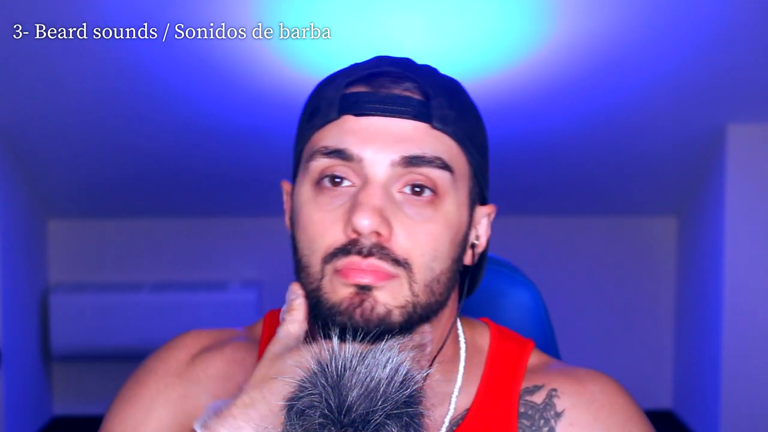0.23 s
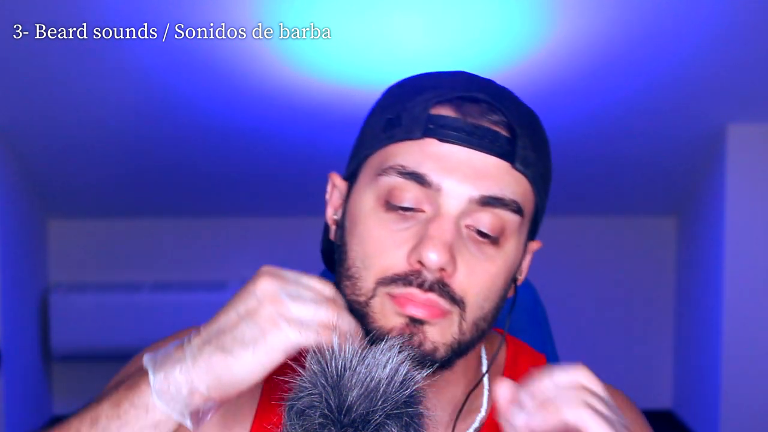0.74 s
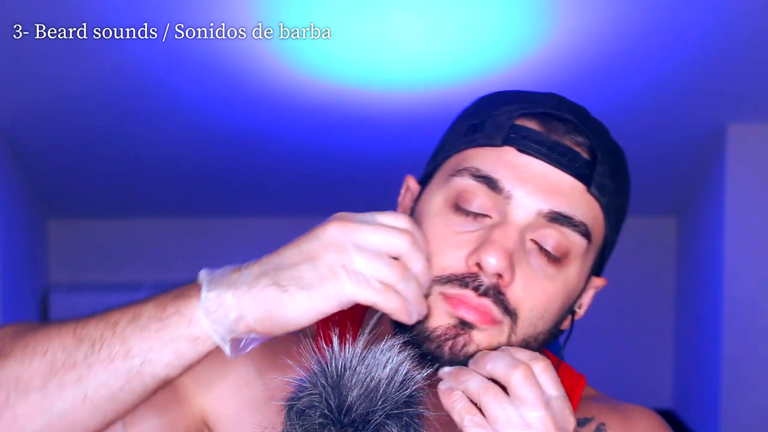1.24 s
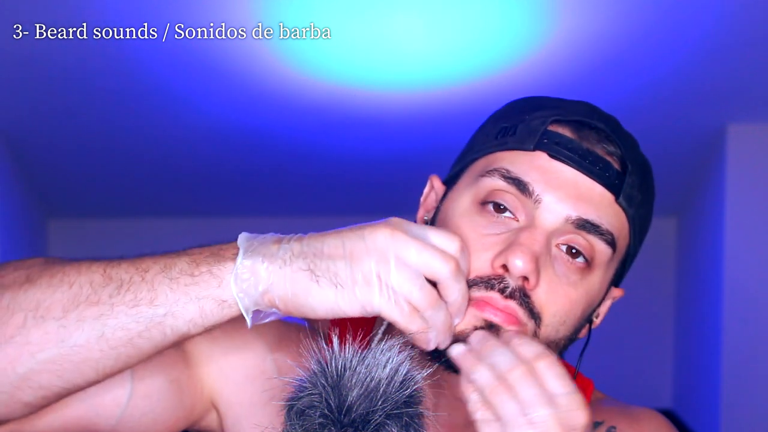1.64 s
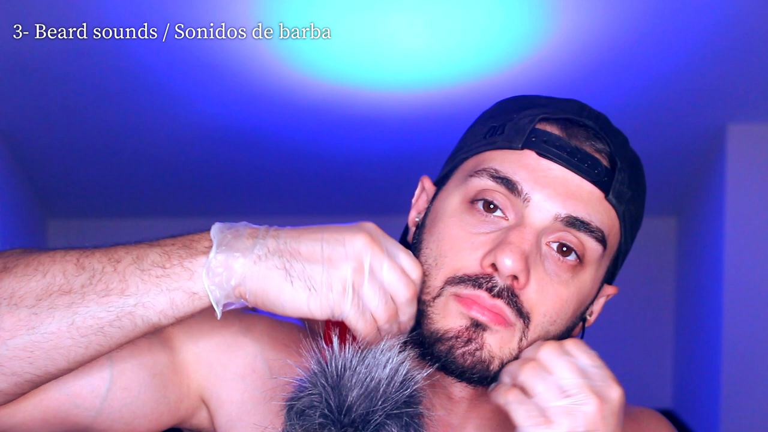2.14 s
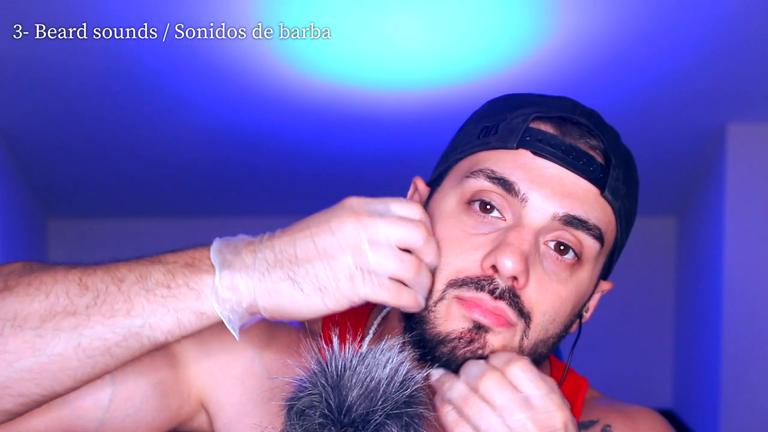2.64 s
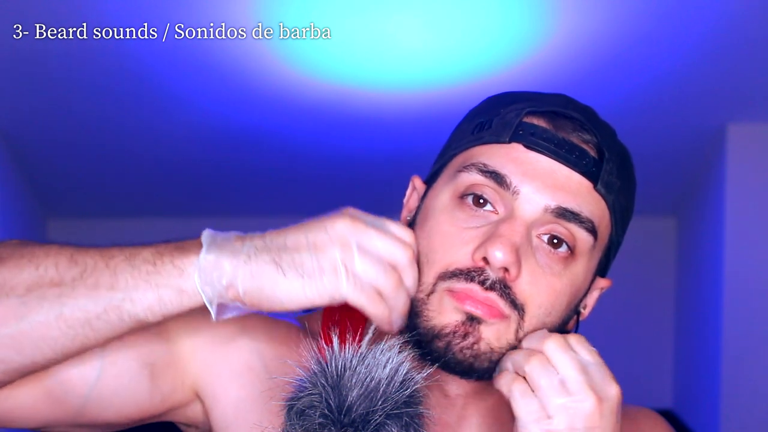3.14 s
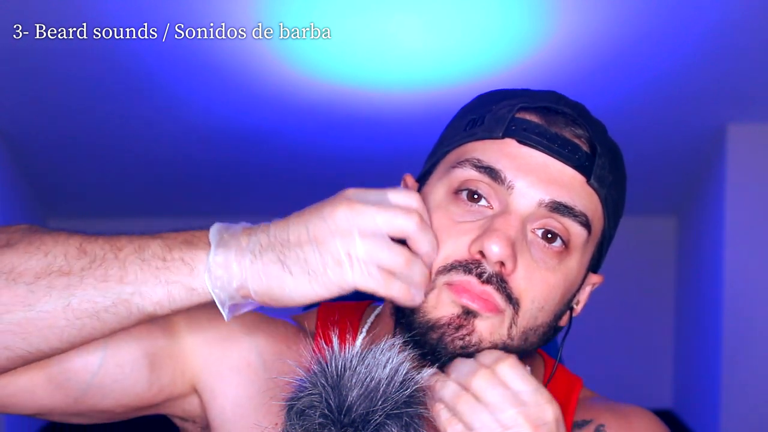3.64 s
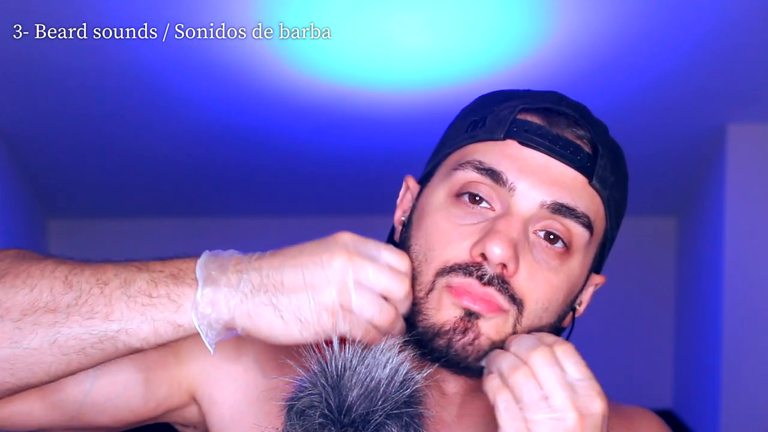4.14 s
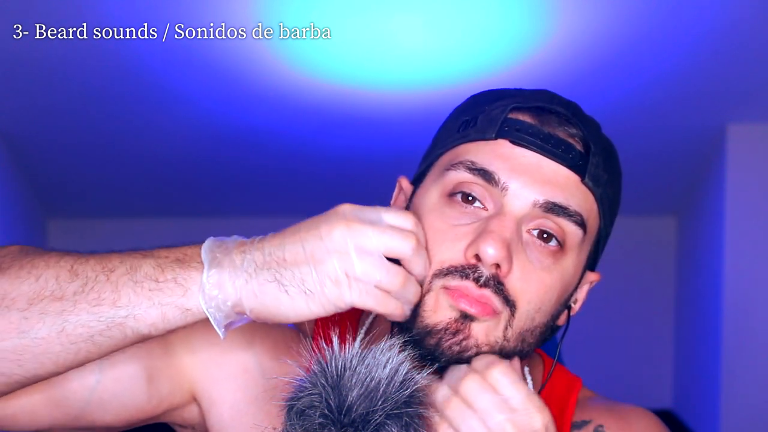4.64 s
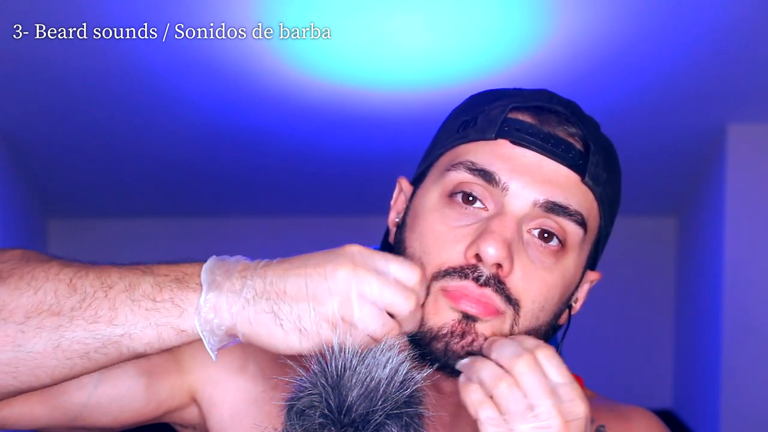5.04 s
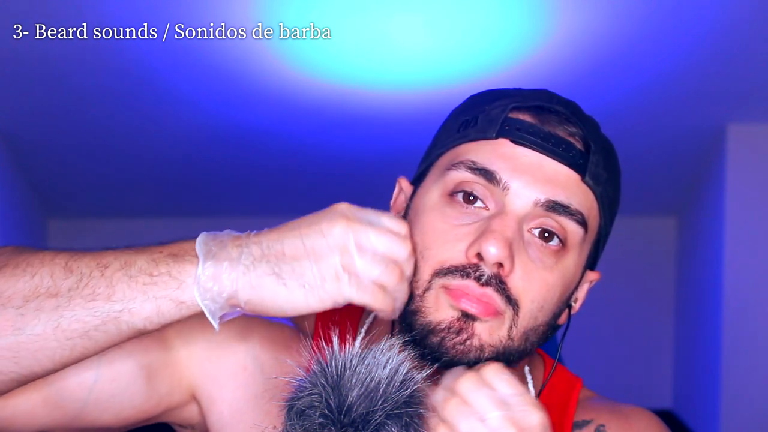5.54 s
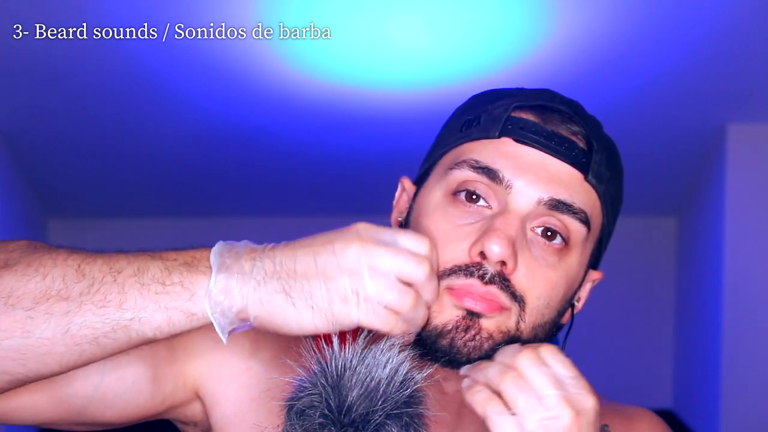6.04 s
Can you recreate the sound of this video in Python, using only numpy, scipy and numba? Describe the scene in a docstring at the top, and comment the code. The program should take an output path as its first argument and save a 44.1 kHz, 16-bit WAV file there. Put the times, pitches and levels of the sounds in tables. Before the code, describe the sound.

Close, bristly beard scratching in uneven strokes, first on the chin, then also on the right, with a faint appliance hum behind.

```python
"""Two gloved hands scratch a short beard close to a furry stereo microphone in a small room.
From the start an appliance hums, air stirs and a flutter too low to hear rocks the microphone.
One hand works on the chin: thousands of hairs catch and slip free, and skin rubs softly under them.
Something bumps at 0.3 s, then single stiff hairs begin to snap and a fingertip taps now and then.
At 1.1 s the other hand joins in on the cheek, to the right. A low rumble swells once, around 2.5 s."""
import sys
import numpy as np
from scipy import signal
from scipy.fft import rfft, irfft, next_fast_len
from scipy.io import wavfile
from scipy.ndimage import uniform_filter1d, map_coordinates
from numba import njit

SR = 44100
rng = np.random.default_rng(int(sys.argv[2]) if len(sys.argv) > 2 else 0)


def transcribe(u):
    """Save the signal u as a 16-bit wav file named by the first command-line argument.

    u: samples, shape (n,) or (channels, n), limited to [-1, 1]; the rate is SR.
    q: integer samples, one column per channel.
    """
    v = np.clip(np.atleast_2d(u).T, -1, 1)
    q = np.round(v * 32767).astype(np.int16)
    wavfile.write(sys.argv[1], SR, q)


N = 276948
TIME = np.arange(N) / SR
CONTROL_TIME = TIME[::64]  # a coarser clock for slow changes
REST_HZ = 9830  # pitch of the hairs between strokes


def undb(db):
    """Turn decibels into a gain to multiply by."""
    return 10 ** (np.asarray(db) / 20)


def unit(x):
    """Scale a sound to an average (rms) level of 1."""
    return x / np.sqrt(np.mean(x ** 2))


def colour(x, points):
    """Shape the tone along a curve of (pitch_hz, level_db) points."""
    hz, db = np.transpose(points)
    size = next_fast_len(N, True)
    freqs = np.maximum(np.arange(size // 2 + 1) * SR / size, 1)
    gain = undb(np.interp(np.log(freqs), np.log(hz), db))
    return irfft(rfft(x, size) * gain, size)[..., :N]


def walk(rate_hz):
    """A smooth random wobble of size about 1 that turns about rate_hz times a second."""
    hold = max(int(SR / rate_hz), 1)
    steps = np.repeat(rng.standard_normal(N // hold + 1), hold)
    return unit(uniform_filter1d(steps, hold)[:N])


def stereo_noise(alike_hz):
    """Noise that is the same left and right below alike_hz."""
    mid, side = rng.standard_normal((2, N))
    side = signal.sosfilt(signal.butter(1, alike_hz, "high", fs=SR, output="sos"), side)
    return mid + side * np.array([[1], [-1]])


def room_echo(x, fade_s, onset_s):
    """The walls return a cloud of echoes, different on each side, that falls 60 dB in fade_s."""
    t = TIME[:SR]
    build_up = 1 - np.exp(-(t / onset_s) ** 2)
    tails = rng.standard_normal((2, SR)) * np.exp(-np.log(1000) * t / fade_s) * build_up
    tails /= np.sqrt(np.sum(tails ** 2, axis=1, keepdims=True))
    return signal.fftconvolve(x[None], tails, axes=1)[:, :N]


def appliance_hum():
    """An appliance hums with a few steady tones; the higher ones waver more."""
    # tones of the hum: pitch_hz, level_db
    tones = [(100, -51.5), (152.7, -66), (300.7, -72), (505, -75), (630, -74), (872, -78.5)]
    hum = np.zeros(N)
    for hz, db in tones:
        phase = 2 * np.pi * (hz * TIME + rng.random()) + hz / 700 * walk(5)
        hum += undb(db) * np.sqrt(2) * np.sin(phase)
    return hum


def room_air():
    """The room gives a low hush, and a draught blows on each side of the microphone."""
    # tone of the hush: pitch_hz, level_db
    hush_tone = [(8, 8), (34, 19.5), (42, -6), (62, 2), (90, 0.5), (180, -5), (400, -6.5), (700, -16.5),
                 (1500, -25.5), (5000, -9), (16000, -19.5)]
    # tone of the draught: pitch_hz, level_db
    draught_tone = [(12, 3.5), (60, -21), (130, -33), (2000, -94)]
    hush = unit(colour(stereo_noise(1240), hush_tone)) * undb(-48.5)
    draught = unit(colour(rng.standard_normal((2, N)), draught_tone)) * undb(-52)
    return hush + draught


def flutter():
    """A wave too slow to hear rocks the microphone."""
    # depth of the rocking: time_s, level_db
    depths = [(0, -24), (2.5, -40), (4.2, -24), (6.28, -30)]
    rate_hz = 3 + .6 * walk(2.5)
    depth = undb(np.interp(TIME, *np.transpose(depths)))
    return np.sin(2 * np.pi * np.cumsum(rate_hz) / SR) * depth


def strokes(table, rest_db, lands_s):
    """Fingers bite in, drag and lift. Gives gain, hair pitch (octaves from REST_HZ) and rasp (Hz)."""
    attack_s, release_s = 0.025, 0.024
    rest_rasp_hz, sag_octaves_per_s = 5240, 0.56
    # once the hand has landed, it stirs the hair even between strokes
    power = undb(rest_db) ** 2 * np.clip((CONTROL_TIME - lands_s) / attack_s, 1e-4, 1)
    pitch_sum, rasp_sum = 0, power * rest_rasp_hz
    for start, length, db, hz, rasp_hz in table:
        age = CONTROL_TIME - start
        contact = np.clip(age / attack_s, 0, 1) * np.exp(-np.maximum(age - length, 0) / release_s)
        push = (contact * undb(db)) ** 2
        # the rasp sinks as the stroke draws the hairs out longer
        sag = 2 ** (-sag_octaves_per_s * (age - length / 2))
        power += push
        pitch_sum += push * np.log2(hz / REST_HZ)
        rasp_sum += push * rasp_hz * sag
    return np.sqrt(power), pitch_sum / power, rasp_sum / power


def sideways(times):
    """How far the hands have moved from in front of the microphone (0) to its side (1)."""
    return np.interp(times, [.8, 1.35], [.15, 1])


def flicks(times, sizes, hz, cycles):
    """Each freed hair gives a tiny wave that peaks at its time and dies within a cycle or two."""
    index = (times * SR).astype(int)[:, None] + np.arange(-10, 26)
    turns = (index / SR - times[:, None]) * hz[:, None]
    age = np.maximum(1 + turns / cycles, 0)
    waves = sizes[:, None] * (age * np.exp(1 - age)) ** 2 * np.cos(2 * np.pi * turns)
    return np.bincount(np.clip(index, 0, N - 1).ravel(), waves.ravel(), N)


def stereo_flicks(times, sizes, hz, cycles, lag_s, pan_db, bounce_db):
    """A flick reaches the right side first, the left later and duller, and bounces off face or palm."""
    # tone on the far (left) side: pitch_hz, level_db
    far_tone = [(2000, 5), (5000, 2), (8000, 5), (11000, 3), (15500, -1.5)]
    detour_s = 0.000188 + .0006 * rng.exponential(size=(len(times), 2)).T
    right = flicks(times, sizes, hz, cycles)
    right += flicks(times + detour_s[0], sizes * undb(bounce_db), hz, cycles)
    left = flicks(times + lag_s, sizes * undb(pan_db), hz, cycles)
    left += flicks(times + detour_s[1], sizes * undb(.5 * pan_db - 15), hz, cycles)
    return np.array([colour(left, far_tone), right])


@njit
def rasp(x, hz, width, ring, leak):
    """The longest hairs in the grip ring at hz; below that only the share leak gets through."""
    y, band_state, low_state = np.empty(len(x)), 0., 0.
    for i in range(len(x)):
        step = np.tan(np.pi * hz[i] / SR)
        band = (band_state + step * (x[i] - low_state)) / (1 + step * (step + width))
        low = low_state + step * band
        high = x[i] - width * band - low
        band_state, low_state = 2 * band - band_state, 2 * low - low_state
        y[i] = high + ring * band + leak * low
    return y


def glove(x, delay_s, share):
    """The glove throws the sound back; as the fingers flex, the gap changes and the tone shifts."""
    positions = np.arange(N) - SR * delay_s * np.exp(0.34 * walk(11))
    echo = map_coordinates(x, [positions], order=3)
    return (x - share * echo) / np.hypot(1, share)


def scratch(hand, count, size_db, limit_db, catch_db, lag_s, pan_db):
    """A fingertip ploughs through stubble: many faint flicks, a few strong, in clumps as it catches."""
    # tone of the beard: pitch_hz, level_db
    beard_tone = [(300, -8.5), (1500, 3.5), (3200, 4.5), (5000, 1), (8000, -5), (11000, -2.5), (15500, 1)]
    times = rng.uniform(0, N / SR, count)
    gain, pitch, rasp_hz = (np.interp(TIME, CONTROL_TIME, control) for control in hand)
    detune, lag_spread, pan_spread = rng.standard_normal((3, count))
    pull_db = size_db * rng.exponential(size=count) + catch_db * np.interp(times, TIME, walk(140))
    # a hair can only bend so far before it slips
    bend = np.tanh(pull_db / limit_db)
    sizes = undb(limit_db * bend) * rng.choice([-1, 1], count)
    # hairs held shorter or bent further ring higher
    octaves = np.interp(times, TIME, pitch) + 0.17 * detune * (1 - .5 * bend) + 0.041 * (bend - .5)
    hz = np.clip(REST_HZ * 2 ** octaves, 1000, SR * .42)
    sound = stereo_flicks(times, sizes * np.sqrt(hz / REST_HZ), hz, cycles=0.65,
                          lag_s=lag_s * sideways(times) + .000018 * lag_spread,
                          pan_db=pan_db + 0.79 * pan_spread, bounce_db=-8.5)
    sound = [rasp(side, rasp_hz, width=.58, ring=.52, leak=.47) for side in sound]
    sound = [glove(side, delay_s=0.000187, share=0.22) for side in sound]
    sound = colour(np.array(sound), beard_tone)
    return gain * sound / np.sqrt(np.mean(sound[1] ** 2))


def chin_scratch():
    """One hand draws slow strokes through the hair on the chin, nearly in front."""
    # strokes on the chin: start_s, length_s, level_db, pitch_hz, rasp_hz
    chin_strokes = [(0, 0.14, -48, 10200, 5300), (0.135, 0.085, -40.5, 9200, 5130),
                    (0.348, 0.225, -40.5, 9350, 5870), (0.545, 0.074, -38, 8100, 6960),
                    (0.629, 0.12, -42, 8100, 5750), (0.762, 0.24, -40.5, 9250, 4700),
                    (1.005, 0.345, -43, 9600, 6200), (1.455, 0.12, -41.5, 9400, 6300),
                    (1.728, 0.073, -42, 8800, 4900), (2.369, 0.29, -40.5, 9900, 4630),
                    (2.72, 0.32, -41.0, 9700, 5000), (3.213, 0.199, -45, 8700, 4350),
                    (3.484, 0.13, -42, 11200, 6260), (3.692, 0.25, -39.5, 10700, 5000),
                    (4.436, 0.35, -40.5, 9700, 5030), (4.788, 0.232, -39.5, 9400, 4200),
                    (5.57, 0.15, -40.5, 9400, 4740), (5.722, 0.023, -40, 6850, 4330),
                    (5.85, 0.23, -40, 9200, 4740)]
    hand = strokes(chin_strokes, rest_db=-43 - 6, lands_s=0)
    return scratch(hand, count=26000, size_db=3, limit_db=27, catch_db=1.5, lag_s=.000058, pan_db=-3.5)


def rubs(table, rest_db):
    """Gain of slow rubs that swell and fade over a light resting touch."""
    swells = sum((undb(db) * np.exp(-.5 * ((TIME - middle) / half) ** 2)) ** 2
                 for middle, half, db in table)
    return np.sqrt(undb(rest_db) ** 2 + swells)


def skin_rub():
    """Gloves stick and slip on skin: a grainy sound, light from fingertips and dull from palms."""
    # fingertips dragging over skin: middle_s, half_length_s, level_db
    tip_rubs = [(.58, 0.041, -56.5), (1.66, 0.38, -58.5), (4.8, 0.19, -58.5), (5.86, 0.2, -54)]
    # tone of the fingertips: pitch_hz, level_db
    tip_tone = [(200, 3), (800, 3), (2000, 5), (3000, -5), (6000, -16.5)]
    # palms and arms brushing as they move into place: middle_s, half_length_s, level_db
    palm_rubs = [(.58, 0.13, -51.5), (.9, 0.24, -59.5), (1.8, 0.29, -59), (3.35, 0.35, -62.5),
                 (5.38, 0.13, -61)]
    # tone of the palms: pitch_hz, level_db
    palm_tone = [(100, 1), (220, 12.5), (480, 7.5), (700, -2), (950, 4), (1600, -8), (4000, -64)]
    grain = undb(2.14 * walk(450) + 1.77 * walk(35))
    tips = unit(colour(stereo_noise(1800) * grain, tip_tone)) * rubs(tip_rubs, rest_db=-61)
    palms = unit(colour(stereo_noise(1700) * grain, palm_tone)) * rubs(palm_rubs, rest_db=-67.5)
    return (tips + palms) * undb([[-1.6], [1.3]])  # a little to the right


def bump():
    """A soft blow near the microphone rings briefly in the room."""
    # the blow and its rebound: start_s, level_db
    hits = np.array([(0.2941, -32), (0.3081, -39)])
    # tones it rings with: pitch_hz, level_db, fade_s (time to fall 60 dB)
    tones = [(256, -0.5, 0.055), (411, 0.5, 0.031), (459, -5, 0.18), (500, -8.5, 0.11), (600, -4.5, 0.035),
             (1030, -7, 0.015), (1480, -19, 0.022)]
    age = np.maximum(TIME[:SR] - hits[:, :1], 0)
    ring = sum((-1) ** k * undb(db) * np.sin(2 * np.pi * hz * age) * np.exp(-np.log(1000) * age / fade_s)
               for k, (hz, db, fade_s) in enumerate(tones))
    blow = np.pad(undb(hits[:, 1]) @ ring, (0, N - SR))
    # long waves reach both sides alike, so they share one echo
    echo = room_echo(blow, fade_s=0.65, onset_s=0.005)[0] * undb(-4.7)
    return (blow + echo) * undb([[-1.1], [.7]])


def hair_snaps():
    """Stiff hairs snap free one at a time, each with a sharp tick."""
    # single hairs: time_s, level_db, pitch_hz
    hairs = [(0.5747, -17.5, 8500), (0.6783, -16, 7200), (0.7134, -14, 6600), (0.7383, -16, 6800),
             (0.8255, -18, 8700), (1.1145, -16, 8100), (1.4595, -13, 7900), (1.5331, -16.5, 7200),
             (1.6898, -4, 12800), (1.7101, -13, 8000), (1.7976, -14.5, 12500), (2.1096, -12, 8600),
             (2.2054, -13, 12300), (2.2848, -9.8, 10600), (2.9388, -10.5, 9000), (3.1171, -10, 8500),
             (3.5004, -6, 10700), (3.5193, -4, 9800), (3.5519, -7.5, 11200), (3.8945, -7.5, 13000),
             (3.9875, -7.5, 9200), (4.0715, -10, 11700), (4.1154, -1, 10400), (4.1891, -7, 10100),
             (4.434, -12, 9300), (4.455, -11, 9400), (4.6279, -14.5, 7500), (4.9074, -13, 10400),
             (5.1826, -9.5, 9900), (5.23, -15, 9300), (5.5219, -11.3, 10400), (6.0258, -5.5, 8700),
             (6.0349, -13, 7900)]
    times, level_db, hz = np.transpose(hairs)
    side = sideways(times)
    snaps = stereo_flicks(times, undb(level_db), hz, cycles=.7, lag_s=.00014 * side,
                          pan_db=-3 - 10 * side, bounce_db=-15)
    # a hair is too thin to give off bass
    return signal.sosfilt(signal.butter(2, 4200, "high", fs=SR, output="sos"), snaps)


def finger_taps():
    """A fingertip lands: a soft pat that the flesh damps at once."""
    # taps on the jaw: start_s, level_db, pitch_hz
    taps = [(.589, -42, 840), (1.043, -45, 433), (4.521, -46.5, 980), (5.464, -44, 1900)]
    pats = np.zeros(N)
    for start, db, hz in taps:
        age = np.maximum(TIME - start, 0)
        pats += undb(db) * np.sin(2 * np.pi * hz * age) * np.exp(-age / 0.0049)
    return pats


def cheek_scratch():
    """The other hand lands later and scratches the cheek, quicker and louder, on the right."""
    # strokes on the cheek: start_s, length_s, level_db, pitch_hz, rasp_hz
    cheek_strokes = [(1.095, 0.041, -43, 8900, 6800), (1.283, 0.1, -37, 9500, 7300),
                     (1.42, 0.14, -37.5, 8540, 7200), (1.708, 0.22, -35.5, 11100, 4630),
                     (2.022, 0.15, -38, 9200, 7700), (2.173, 0.075, -32, 9600, 4800),
                     (2.342, 0.097, -39, 9400, 6600), (2.462, 0.05, -33.5, 9250, 5070),
                     (2.56, 0.19, -40.5, 10900, 7150), (2.762, 0.1, -36.5, 9800, 7040),
                     (2.87, 0.24, -34, 10000, 6700), (3.05, 0.14, -33.5, 10200, 6500),
                     (3.187, 0.11, -32, 9400, 5500), (3.408, 0.085, -38, 9900, 6600),
                     (3.482, 0.091, -31.5, 10300, 7040), (3.882, 0.22, -35, 9400, 7350),
                     (4.095, 0.089, -31.5, 9200, 6900), (4.193, 0.18, -34, 9650, 4660),
                     (4.405, 0.25, -38, 8950, 6800), (4.595, 0.17, -36.5, 10700, 7240),
                     (4.822, 0.13, -34, 10900, 7100), (4.954, 0.22, -37, 10900, 6200),
                     (5.172, 0.062, -33.5, 9600, 7100), (5.294, 0.091, -41.5, 10400, 5700),
                     (5.402, 0.089, -37, 9100, 6300), (5.853, 0.2, -35.5, 10200, 5600),
                     (6.064, 0.2, -34.5, 10000, 7150)]
    hand = strokes(cheek_strokes, rest_db=-43, lands_s=1.1)
    return scratch(hand, count=22000, size_db=3.5, limit_db=27.5, catch_db=0.54,
                   lag_s=0.00013, pan_db=-14.8)


def rumble():
    """A low rumble swells and fades once."""
    # tone of the rumble: pitch_hz, level_db
    tone = [(20, -6), (31, 6), (42, -20), (60, -38), (150, -74)]
    swell = np.exp(-((TIME - 2.53) / .3) ** 4)
    return unit(colour(stereo_noise(150), tone)) * undb(-48.5) * swell


def scene():
    """Add up all that reaches the microphone; the walls faintly echo the beard."""
    beard = cheek_scratch() + chin_scratch() + hair_snaps()
    walls = room_echo(beard[1], fade_s=.3, onset_s=.004) * undb(-21)
    touches = skin_rub() + finger_taps() + bump()
    background = appliance_hum() + room_air() + rumble() + flutter()
    return beard + walls + touches + background


def record(dry):
    """Cut off the highest treble, above 15900 Hz."""
    return signal.sosfilt(signal.ellip(10, .2, 70, 15900, fs=SR, output="sos"), dry)


dry = scene()
out = record(dry)
transcribe(out)
```